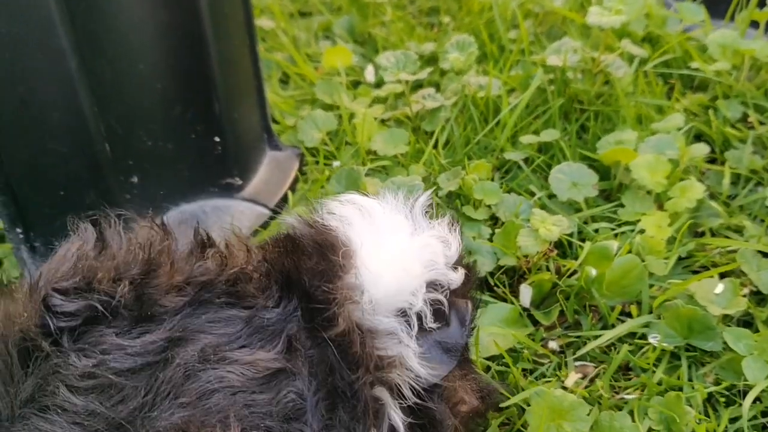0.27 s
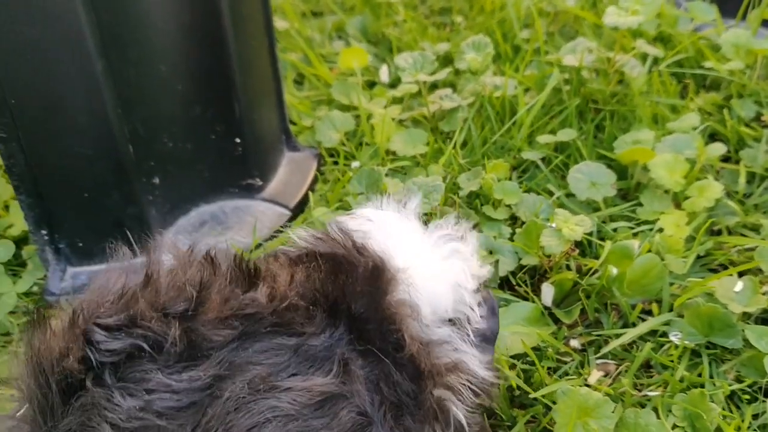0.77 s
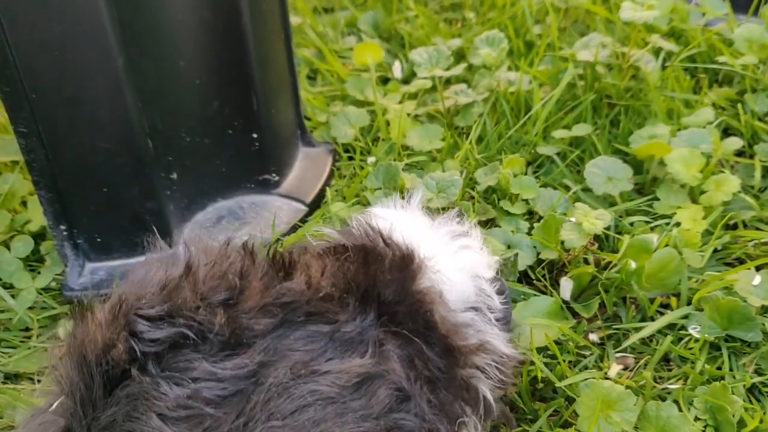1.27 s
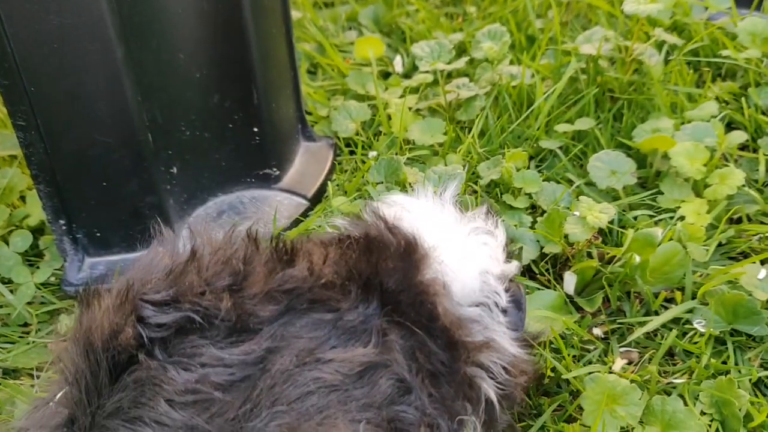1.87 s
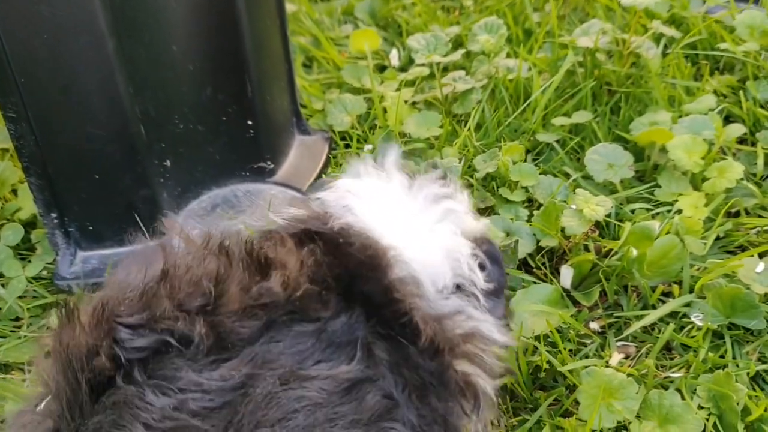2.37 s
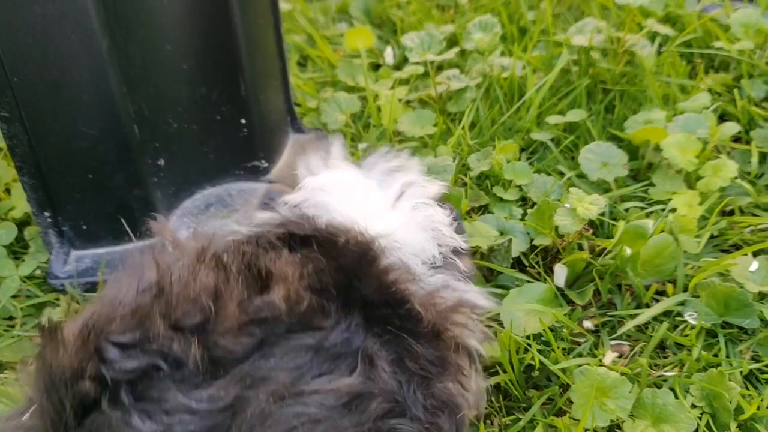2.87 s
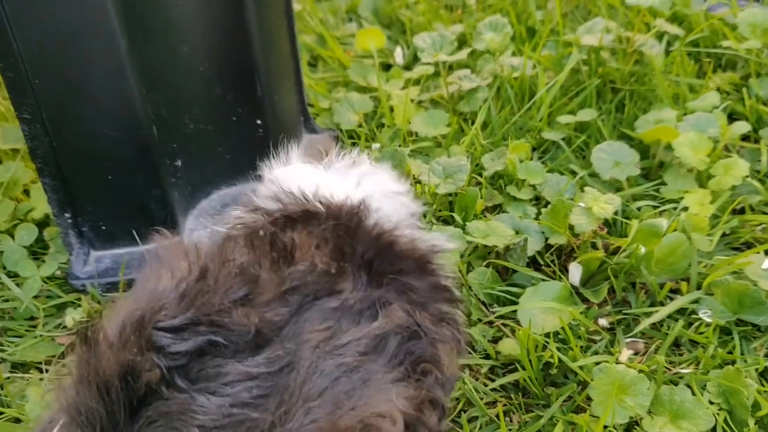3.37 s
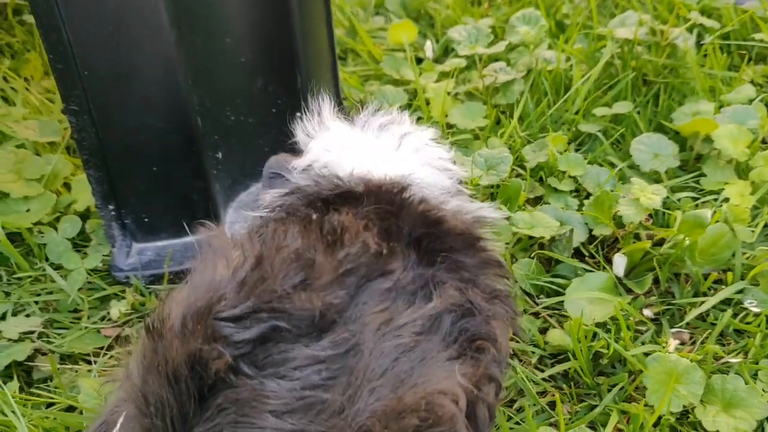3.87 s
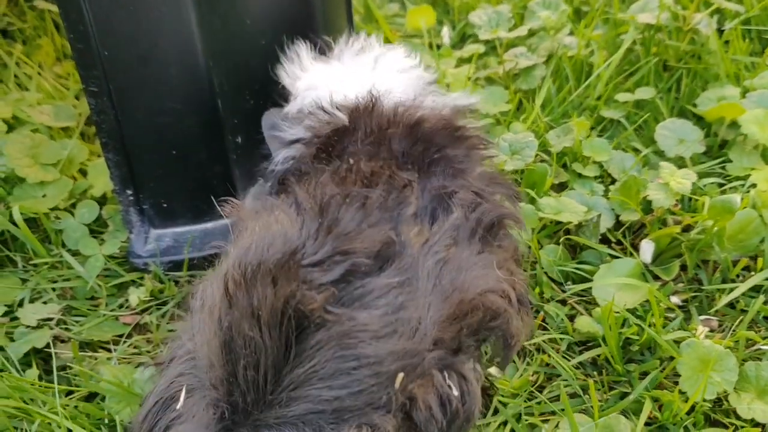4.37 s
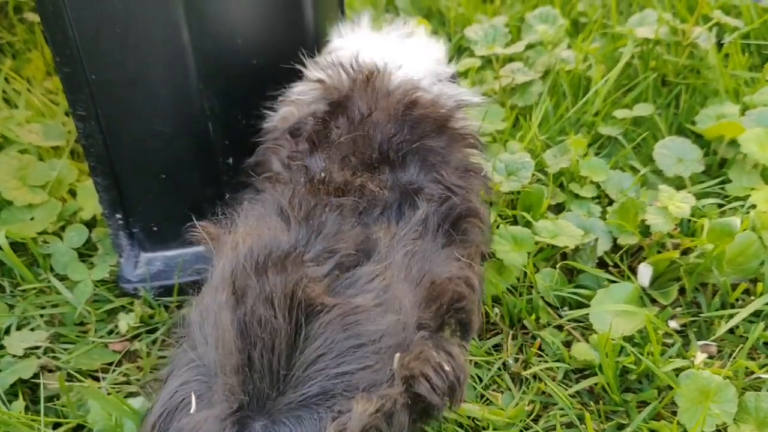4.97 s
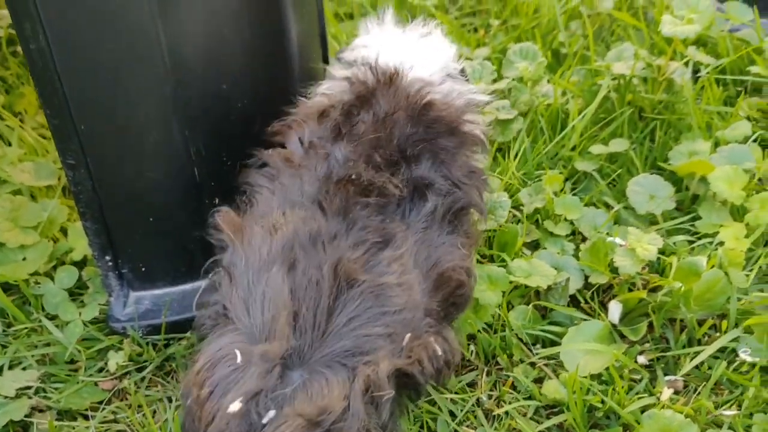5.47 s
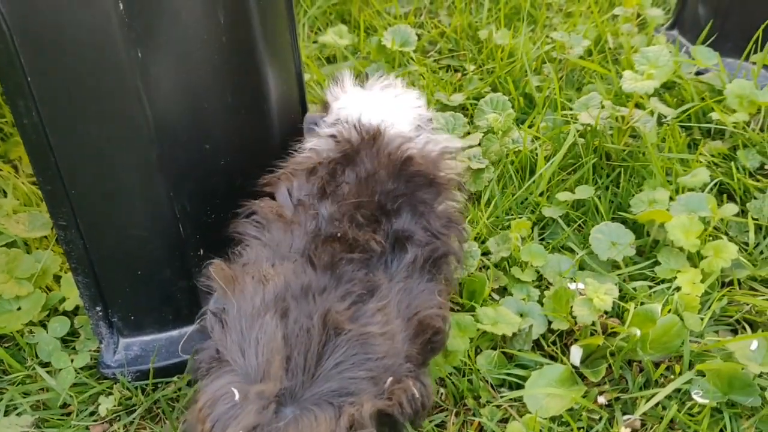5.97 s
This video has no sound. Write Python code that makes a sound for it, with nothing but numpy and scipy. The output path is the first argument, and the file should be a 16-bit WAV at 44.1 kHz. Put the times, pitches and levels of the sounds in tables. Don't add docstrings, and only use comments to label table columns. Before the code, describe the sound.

A hand-held phone an arm's length away picks up a small guinea pig slightly left of centre. Its soft, nearly pure whistles glide up and down in brief clusters, mixed with slack throaty clicks, thinning out later. Low wind rumble and thumps, mostly left, cover a steady distant road hum. Faint bird chirps, tree rustle, dry grass snaps, a late plastic tap and a faint car whine complete the garden.

```python
import sys
import numpy as np
from scipy import signal
from scipy.fft import rfft, irfft, next_fast_len
from scipy.io import wavfile
from scipy.ndimage import uniform_filter1d

SR = 44100
rng = np.random.default_rng(int(sys.argv[2]) if len(sys.argv) > 2 else 0)


def voltage_ratio(decibels):
    exponent = np.asarray(decibels, float) / 20
    return 10 ** exponent


def dump(signal):
    limited = np.clip(np.atleast_2d(signal).T, -1, 1)
    pcm = np.round(limited * 32767).astype(np.int16)
    wavfile.write(sys.argv[1], SR, pcm)


N = 274346
T = np.arange(N) / SR

# time [s], peak [dB], width [ms], push +1 or suck -1.
LEFT_EDDIES = [(.319, -29, 6.2, -1), (0.352, -23.5, 3.5, 1), (.401, -34, 11, 1), (.427, -29.5, 6, -1),
               (.501, -26.5, 7.7, -1), (.611, -20.5, 4.1, -1), (.652, -19.5, 4.4, -1),
               (.924, -24.5, 4.6, -1), (1.242, -24.5, 5.2, -1), (1.585, -24, 9.3, -1), (1.67, -21, 6.3, -1),
               (1.734, -16, 5.7, -1), (2.345, -27, 10.1, -1), (3.112, -23, 4.54, -1), (3.19, -16, 4.8, 1),
               (3.286, -28.5, 5, 1), (3.381, -27.5, 8, -1), (4.253, -29, 5.5, -1)]
RIGHT_EDDIES = [
    (3.271, -23, 3.2, 1),
    (3.333, -28, 3.5, 1),
    (5.385, -34, 4.6, 1),
    (5.419, -31, 6, 1),
    (5.55, -28, 5.3, -1),
    (5.618, -27.5, 4.8, -1),
    (5.643, -31, 6.5, -1),
    (5.733, -32, 5.4, -1),
]
# height of the gust [s], level [dB].
LEFT_GUSTS = [(.5, -35.5), (.78, -35), (1.15, -40.5), (1.68, -36), (2.27, -43.5), (3.02, -41), (3.25, -39),
              (4.05, -39.5), (4.75, -45.5), (5.42, -43.5), (6.0, -40)]
RIGHT_GUSTS = [
    (.48, -40),
    (1.27, -47),
    (2.0, -56),
    (2.5, -49),
    (3.25, -39.5),
    (3.75, -45),
    (5.0, -46),
    (5.5, -35),
    (5.879, -45),
]
# frequency [Hz], density [dB per Hz].
TRAFFIC_SPECTRUM = [(35, -43), (60, -4.5), (91, -5.5), (118, -10), (220, -7.5), (330, -13), (575, -20),
                    (1100, -22.5), (1600, -29.5), (2300, -31.5), (5000, -38.5), (5500, -37), (8000, -38.5),
                    (13000, -37)]
# frequency [Hz], correlation [0-1].
PORT_LIKENESS = [(60, 1), (300, 0.74), (640, 0.4), (1400, 0), (16000, 0.04)]
# frequency [Hz], width [Hz], level [dB].
ENGINE_HUMS = [(86.1, 7.7, -53.5), (150.45, 2.6, -53.5)]
# time [s], pitch [Hz], level [dB].
CAR_WHINE = [
    (5.6, 451, -90),
    (5.72, 462, -52),
    (5.9, 450, -62),
    (6.1, 440, -56.5),
    (6.22, 444, -66),
]
# time [s], level [dB].
RUSTLE = [
    (0.0, -65),
    (0.15, -69),
    (0.95, -73),
    (2.77, -62.5),
    (4.02, -63),
    (5.25, -66),
    (5.72, -65),
    (6.22, -66.5),
]
# start [s], length [s], rate [Hz], peak [dB], throat ring [Hz].
CREAKS = [(.4492, 0, 200, -32, 1000), (.584, 0, 200, -41, 1050), (.6075, .0065, 190, -35, 850),
          (1.356, 0, 200, -39, 800), (1.4065, 0, 200, -35, 800), (2.5915, .008, 240, -33, 750),
          (3.3535, .0135, 228, -31.5, 900), (4.4395, .0035, 400, -34, 750), (4.4452, .007, 320, -36, 1000),
          (4.8545, 0, 300, -37, 1000), (4.8992, .005, 240, -35, 950), (4.9873, .007, 178, -32, 850),
          (4.9965, .0105, 350, -34, 1050), (5.2755, .0085, 400, -36, 1400), (5.2985, 0, 200, -39, 1800),
          (5.4505, .006, 200, -37, 850)]
# frequency [Hz], width [Hz], gain [dB].
MOUTH_AND_CHEST = [(1750, 600, -17), (500, 340, -1)]
# start [s], length [s], first pitch [Hz], level [dB], left minus right [dB].
CHIRPS = [(0.533, 0.038, 5320, -57.5, -2), (0.599, 0.098, 5300, -74, -5), (1.76, 0.036, 5230, -62.5, -5),
          (2.55, 0.047, 4950, -71, -3), (3.216, 0.09, 5200, -65.5, 0), (3.985, 0.048, 4540, -65, -6),
          (4.013, 0.018, 6190, -63, 8), (4.093, 0.0404, 4700, -64.5, -5), (4.287, 0.059, 4940, -63.5, -6),
          (4.87, 0.054, 4850, -68, -3), (5.785, 0.056, 6720, -71, 10), (5.872, .05, 4990, -68, -6)]
# start [s], length [s], pitch [Hz], effort [dB].
HOLDS = [(0.5776, 0.0034, 872, -40.5), (0.6203, 0.0028, 696.5, -40), (1.366, 0.0062, 790, -39),
         (1.408, 0.015, 835, -36.5), (2.287, 0.015, 725, -35.5), (1.56, 0.053, 758.3, -35.5),
         (1.839, 0.018, 747, -35), (2.157, 0.00682, 1065, -35.5), (2.5845, .003, 770, -38.5),
         (1.893, .012, 955.4, -36.5), (2.056, 0.0096, 824, -35.5), (3.11, .052, 823, -32.5),
         (3.372, .006, 1038, -36.5), (4.29, 0.04, 756, -33), (4.84, .011, 788, -32.5),
         (5.445, 0.0044, 738, -40)]
# start [s], length [s], first pitch [Hz], last pitch [Hz], effort [dB].
SAGS = [(1.794, 0.015, 950, 884, -35.5), (1.816, .02, 810, 743, -35), (2.066, 0.044, 845, 685.6, -34.5),
        (2.302, 0.032, 715, 590, -33), (2.383, 0.0088, 950, 909, -39.5),
        (2.601, 0.0208, 878.4, 752.4, -34.5), (2.908, .022, 970, 829, -37.5),
        (3.097, 0.013, 915, 824, -34.5), (3.377, .011, 1050, 970, -40), (3.909, 0.01, 838, 787, -36.5),
        (5.277, .007, 701, 594, -36)]
RISES = [(1.423, 0.022, 850, 1060, -46), (1.626, 0.023, 780, 910, -41), (1.663, .013, 1005, 1085, -40.5),
         (1.851, .036, 739, 965, -35), (2.108, 0.024, 692, 799, -36), (2.136, 0.01998, 805, 1053, -35.5),
         (2.626, 0.029, 650, 733.5, -35), (4.453, 0.032, 691, 742, -33), (2.328, 0.027, 598, 715, -35),
         (2.355, 0.024, 735, 950, -36.5), (2.397, 0.027, 935, 1336, -38.5), (2.657, 0.011, 742, 1052, -42),
         (2.88, 0.029, 649, 978, -45), (2.965, .008, 1090, 1145, -37.5), (3.31, .024, 750, 934, -38.5),
         (3.344, 0.0062, 879, 983, -37.5), (3.391, .017, 996, 1426, -36.5),
         (4.322, 0.0066, 741, 846, -34.5), (4.859, .011, 711, 801, -32.5), (5.0095, .003, 559.3, 634, -32),
         (5.298, 0.0069, 625, 680.5, -32.5)]
# time [s], share of pitch lost (below 0: gained), width
# [ms].
BREAKS = [(1.364, .25, 3), (1.838, .06, 3), (2.106, .05, 2), (2.327, .17, 3), (2.626, .07, 2),
          (3.125, .12, 1), (4.319, .13, 1.5), (4.331, -.08, 4), (4.49, .15, 3), (4.855, .35, 4),
          (5.014, -.15, 2), (5.298, .2, 3), (5.311, .2, 3)]
# pitch [Hz], gain [dB].
REGISTER = [(570, 1), (620, -1), (765, -0.5), (830, -3.5), (890, -4.5), (960, -1.5), (1050, 0.5),
            (1400, -15.5)]
# overtone frequency [Hz], gain [dB].
OVERTONE_GAIN = [(900, -13), (1200, -12), (1500, -15), (1700, -20), (1950, -20), (2200, -25), (2800, -40)]
# start [s], peak [dB], centre [Hz], left minus right [dB].
STEM_SNAPS = [
    (0.765, -56, 11000, -1),
    (1.5033, -48, 6000, 4),
    (1.711, -53, 6500, 0),
    (1.842, -44.5, 5000, -1.5),
    (2.1244, -49, 4550, 1),
    (2.4319, -51, 11000, -1),
    (4.899, -45.5, 3500, 1),
]
# frequency [Hz], level [dB], decay by 60 dB [s].
HUTCH_RINGS = [(6540, 2, .03), (3860, -4, 0.022), (2500, -3.5, .02), (11300, -8, 0.13), (12900, -6, .04),
               (14400, -8, .16)]


def unit(x):
    return x / np.sqrt(np.mean(x ** 2))


def on_log(hz, table):
    table_hz, value = np.transpose(table)
    return np.interp(np.log(np.maximum(hz, 1)), np.log(table_hz), value)


def resonate(x, hz, width_hz):
    return signal.lfilter(*signal.iirpeak(hz, hz / width_hz, fs=SR), x)


def walk(rate_hz):
    hold = int(SR / rate_hz)
    steps = np.repeat(rng.standard_normal(N // hold + 1), hold)
    return 1.64 * uniform_filter1d(uniform_filter1d(steps, hold), hold)[:N]


def place(x, pan_db):
    return x * voltage_ratio(np.array([[pan_db], [-pan_db]]) / 2)


def add(out, start_s, x):
    i = int(start_s * SR)
    out[..., i:i + x.shape[-1]] += x[..., :N - i]


def port_wind(gusts, calm_db, eddies):
    gust_s = 0.15
    force = voltage_ratio(calm_db) + sum(voltage_ratio(db) * np.exp(-((T - at) / gust_s) ** 2) for at, db in gusts)
    low = signal.butter(2, [22, 85], "band", fs=SR, output="sos")
    rumble = unit(signal.sosfilt(low, rng.standard_normal(N)))
    out = rumble * force * voltage_ratio(-3.5 + 3.0 * walk(14))
    for at, db, ms, push in eddies:
        u = np.arange(-.04, .04, 1 / SR) / (ms * 0.00065)
        kick = (1 - u ** 2 + 1.4 * u) * np.exp(-abs(u) ** 1.54)
        add(out, at - .04, np.sign(push) * voltage_ratio(db + 0.5) * kick)
    return out


def wind():
    left = port_wind(LEFT_GUSTS, -51.5, LEFT_EDDIES)
    right = port_wind(RIGHT_GUSTS, -50, RIGHT_EDDIES)
    return np.array([left, right])


def road_noise():
    size = next_fast_len(N)
    f = np.fft.rfftfreq(size, 1 / SR)
    shape = voltage_ratio(on_log(f, TRAFFIC_SPECTRUM)) * (f > 40)
    mid, side = (rfft(rng.standard_normal(size)) * shape for _ in range(2))
    alike = np.clip(on_log(f, PORT_LIKENESS), 0, 1)
    pair = mid * np.sqrt(1 + alike) + np.array([[1], [-1]]) * side * np.sqrt(1 - alike)
    out, swell = 0, walk(0.63)
    for octave in np.arange(5, 14.5, .5):
        share = np.clip(1 - 2 * abs(np.log2(f + 1) - octave), 0, 1)
        depth = np.clip((13 - octave) / 5, .15, 1)
        level_db = depth * (1.47 * swell + 1.12 * walk(6) + 0.96 * walk(25))
        out = out + irfft(pair * share, size)[:, :N] * voltage_ratio(level_db)
    return unit(out) * voltage_ratio(-47.5)


def engine_hums():
    return sum(unit(resonate(rng.standard_normal(N), hz, width_hz)) * voltage_ratio(db)
               for hz, width_hz, db in ENGINE_HUMS)


def car_whine():
    s, hz, db = np.transpose(CAR_WHINE)
    pitch = np.interp(T, s, hz) * (1 + 0.0286 * walk(60))
    return np.sin(2 * np.pi * np.cumsum(pitch) / SR) * voltage_ratio(np.interp(T, s, db) + 3.2 * walk(30))


def leaves():
    s, db = np.transpose(RUSTLE)
    bands = [unit(resonate(rng.standard_normal((2, N)), hz, 720)) * voltage_ratio(2.73 * walk(14))
             for hz in (2170, 2920, 3330, 3860, 4580)]
    return place(sum(bands) * voltage_ratio(np.interp(T, s, db) - 7.5), -4.5)


def throat_slap(ring_hz):
    soft = signal.butter(4, 1800, fs=SR, output="sos")
    push = signal.sosfilt(soft, signal.unit_impulse(SR // 40))
    slap = 0
    for k, (hz, width_hz, db) in enumerate([(ring_hz, 520, 0)] + MOUTH_AND_CHEST):
        ring = resonate(resonate(push, hz, width_hz), hz, width_hz)
        slap = slap + voltage_ratio(db) * ring * (-1) ** k
    return slap / abs(slap).max()


def creaks():
    quicken_hz_per_s, fade_db_per_s = 1500, 150
    out = np.zeros(N)
    chances = rng.standard_normal((len(CREAKS), 16, 2))
    for (start, length, rate_hz, db, ring_hz), chance in zip(CREAKS, chances):
        slap = throat_slap(ring_hz)
        s = start
        for late, loud in chance:
            add(out, s, -slap * voltage_ratio(db + loud - fade_db_per_s * (s - start)))
            s += (1 + 0.05 * late) / (rate_hz + quicken_hz_per_s * (s - start))
            if s > start + length:
                break
    return out


def sparrows():
    direct_db, echo_t60_s, warble_fall = -5, 0.42, 0.096
    out, u = np.zeros((2, N)), np.arange(int(.3 * SR)) / SR
    echoes = rng.standard_normal((2, len(u))) * voltage_ratio(-60 * u / echo_t60_s)
    echoes = echoes / np.sqrt(np.sum(echoes ** 2, axis=1, keepdims=True))
    echoes[:, 0] += voltage_ratio(direct_db)
    for s, length, hz, db, pan_db in CHIRPS:
        count = int(length * SR)
        sweep = np.linspace(hz, hz * (1 - warble_fall), count)
        sweep = sweep + 190 * np.sin(2 * np.pi * 70 * u[:count])
        note = np.sin(2 * np.pi * np.cumsum(sweep) / SR) * np.hanning(count)
        heard = signal.fftconvolve(note[None], echoes, axes=1)
        add(out, s, place(heard * voltage_ratio(db + 7.5), pan_db))
    return out


def phrase():
    attack_s, release_s, release_share, arch_db = 0.0032, 0.003, 0.22, 1.5
    rise_bend, sag_bend = 1.25, 1.1
    notes = [(s, d, hz, hz, db, 1) for s, d, hz, db in HOLDS]
    notes += [row + (sag_bend,) for row in SAGS]
    notes += [row + (rise_bend,) for row in RISES]
    size, when, pitch, u = np.zeros(N), [], [], np.linspace(0, 1, 9)
    for s, d, hz0, hz1, db, bend in sorted(notes):
        when = np.append(when, s + d * u)
        pitch = np.append(pitch, hz0 + (hz1 - hz0) * u ** bend)
        end = s + d + release_s + release_share * d
        span = slice(int((s - attack_s) * SR), int(end * SR))
        arch = arch_db * np.clip(2 * (T[span] - s) / d - 1, -1, 1) ** 2
        shape = np.interp(T[span], [s - attack_s, s, s + d, end], [0, 1, 1, 0]) * voltage_ratio(db - arch)
        size[span] = np.maximum(size[span], shape)
    pitch = np.interp(T, np.maximum.accumulate(when), pitch)
    return pitch, size * voltage_ratio(on_log(pitch, REGISTER))


def squeaks():
    catch, catch_ms = 4, .9
    wobble = 1 + .006 * walk(300)
    flutter = voltage_ratio(.4 * walk(300) + .9)
    for at, share, ms in BREAKS:
        near = slice(int((at - .02) * SR), int((at + .02) * SR))
        away_ms = (T[near] - at) * 1000
        wobble[near] *= 1 - share * np.exp(-(away_ms / ms) ** 2)
        flutter[near] *= 1 - np.clip(catch * share, 0, 1) * np.exp(-(away_ms / catch_ms) ** 2)
    pitch, size = phrase()
    pitch, size = pitch * wobble, size * flutter
    effort = (size / voltage_ratio(-37)) ** 0.52
    phase = 2 * np.pi * np.cumsum(pitch) / SR
    second = effort * voltage_ratio(on_log(2 * pitch, OVERTONE_GAIN)) * np.sin(2 * phase)
    third = effort * voltage_ratio(on_log(3 * pitch, OVERTONE_GAIN) - 8.5) * np.sin(3 * phase)
    return np.sqrt(2) * (np.sin(phase) + second + third) * size


def stem_snaps():
    out, u = np.zeros((2, N)), np.arange(int(.15 * SR)) / SR
    for s, db, hz, pan_db in STEM_SNAPS:
        burst = rng.standard_normal(len(u)) * voltage_ratio(db - 60 * u / 0.013)
        add(out, s, place(resonate(burst, hz, hz), pan_db))
    return out


def hutch_tap():
    out, u = np.zeros((2, N)), np.arange(int(.15 * SR)) / SR
    rings = sum(unit(resonate(rng.standard_normal((2, len(u))), hz, 510)) * voltage_ratio(db - 60 * u / t60)
                for hz, db, t60 in HUTCH_RINGS)
    crack = rng.standard_normal(len(u)) * voltage_ratio(-60 * u / 0.0092)
    add(out, 5.5553, place((rings + crack) * voltage_ratio(-33 - 9.5), 3))
    return out


def scene():
    traffic = road_noise() + engine_hums() + car_whine()
    voice = creaks() + squeaks()
    animal = np.array([voice, np.roll(voice, 5)])
    return wind() + traffic + leaves() + animal + sparrows() + stem_snaps() + hutch_tap()


def band_limit(x):
    return signal.sosfilt(signal.butter(12, 16650, fs=SR, output="sos"), x)


def record(dry):
    top_cut = signal.ellip(10, .1, 60, 15700, fs=SR, output="sos")
    mix = signal.sosfilt(top_cut, dry)
    return band_limit(mix)


dry = scene()
out = record(dry)
dump(out)
```